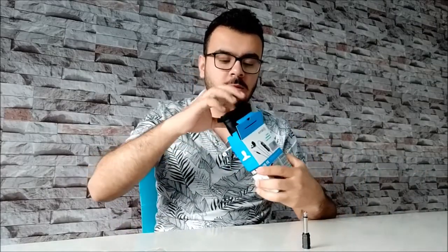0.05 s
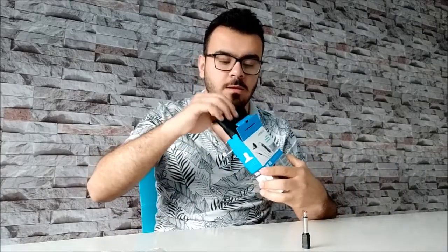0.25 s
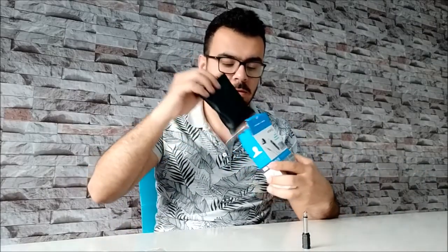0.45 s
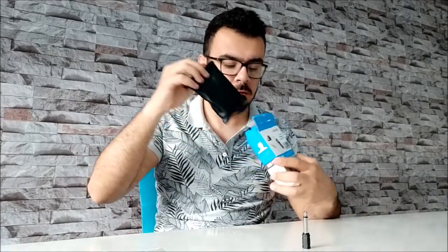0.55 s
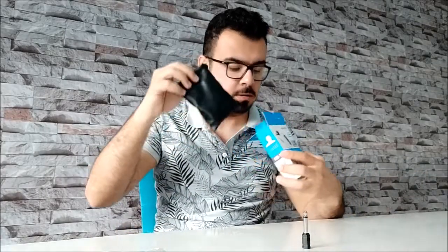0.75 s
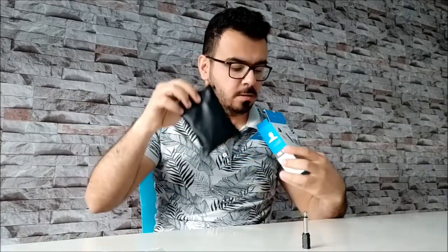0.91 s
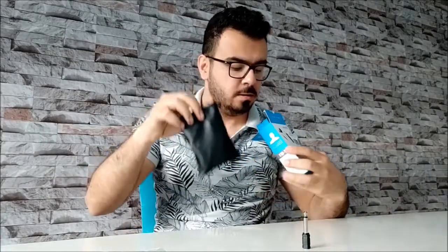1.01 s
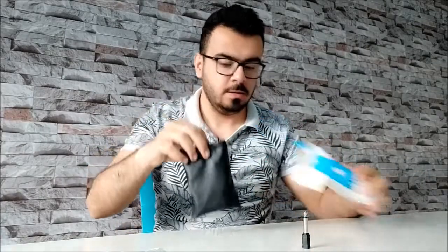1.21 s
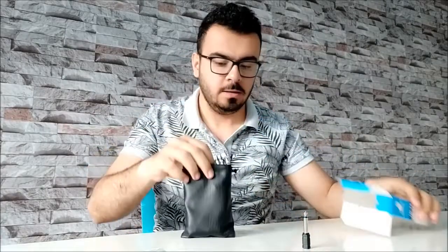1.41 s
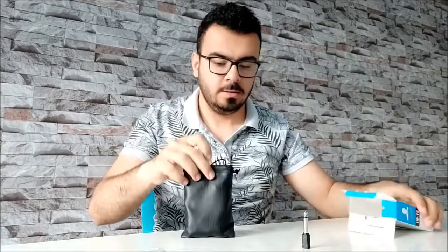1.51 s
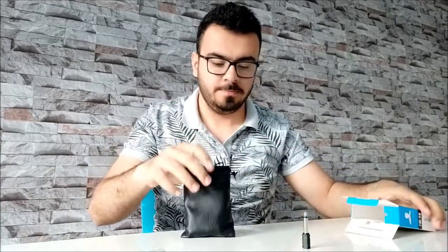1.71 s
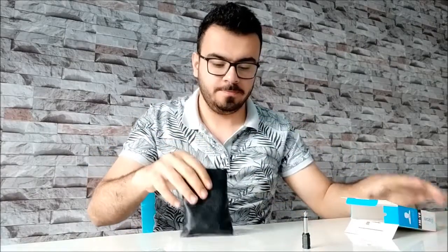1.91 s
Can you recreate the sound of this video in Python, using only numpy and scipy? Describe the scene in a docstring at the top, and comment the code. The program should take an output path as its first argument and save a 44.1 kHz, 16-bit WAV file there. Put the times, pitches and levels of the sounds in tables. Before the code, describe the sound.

Cardboard box hisses and pops as a soft pouch slides out, then is set down.

```python
"""A papery hiss swells as a soft pouch rubs its way out of a small cardboard box, then a hollow pop
as it slips free and the card flexes. Pouch and sleeve rustle; the box is put down and rocks, the
table top booms softly under it, and the pouch crumples alongside.
A stereo pair of microphones hears it all in a small, fairly live room with a low rumble."""
import sys
import numpy as np
from scipy import signal
from scipy.fft import rfft, irfft, next_fast_len
from scipy.io import wavfile
from scipy.ndimage import map_coordinates

SR = 44100
rng = np.random.default_rng(int(sys.argv[2]) if len(sys.argv) > 2 else 0)


def to_wav(sig):
    """Store sig (one row per channel, or 1-D mono) as 16-bit WAV at the path in sys.argv[1].

    Samples outside -1..1 are clipped; the rate is SR.
    """
    pcm = np.clip(np.atleast_2d(sig), -1, 1) * 32767
    pcm = np.round(pcm).astype(np.int16)
    wavfile.write(sys.argv[1], SR, pcm.T)  # frames by channels


N = 85995

RUB_SLIPS_PER_S, RUB_SPREAD_DB = 14000, 2
# Direct sound at the two microphones. Each row: frequency in Hz, left-right likeness (1 is identical).
DIRECT_LIKENESS = [(300, 0.77), (1000, 0.98), (2200, 0.26), (5000, 0.11), (10000, 0.21)]


def pouch_slide():
    """The pouch judders along the card: a fine hiss, and the air in the box answers, rising a little."""
    # Friction through the pull. Each row: time in seconds, level in dB.
    friction = [(0.122, -68), (.14, -61), (0.194, -46.5), (.25, -45), (.29, -41.5), (.335, -40),
                (0.358, -39), (.381, -50), (.388, -56), (.42, -68)]
    # Colour of the hiss. Each row: frequency in Hz, relative level in dB.
    hiss_colour = [(1200, -9.5), (1600, -10), (2500, -9), (3300, -14), (4200, -15.5), (5500, -9),
                   (7300, 0.5), (8600, 1), (9800, 1), (11000, -12), (12600, -7), (14400, -17)]
    # The air in the box. Each row: starting frequency in Hz, width in Hz, relative level in dB.
    air_modes = [(725, 130, -2.5), (888, 106, -0.5)]
    judder_db, judder_per_s, hollow_db = 1.1, 140, -8
    times, levels = np.transpose(friction)
    t = np.arange(N) / SR
    judder = map_coordinates(rng.standard_normal(N // 20), [t * judder_per_s])
    level = amp(np.interp(t, times, levels, left=-120, right=-120) + judder_db * judder)
    hiss = coloured(slips(RUB_SLIPS_PER_S, RUB_SPREAD_DB), [(150, -20.5), (500, -11.5)] + hiss_colour)
    pulled = np.interp(t, [times[0], times[-1]], [0, 1])
    hollow = np.sqrt(1 - pulled) * rubbed(air_modes) + np.sqrt(pulled) * rubbed(air_modes, pitch=1.11)
    return level * panned(-0.5) * (hiss + amp(hollow_db) * hollow)


def card_flexes():
    """The box flexes and pops in the hand, hollow, and too small to radiate bass."""
    # Each row: start in seconds, level in dB, pitch factor, ring length factor, crack in dB, pan in dB.
    flexes = [(.05, -50.5, 1.3, 0.89, -27, -1), (.3505, -26, 0.79, 0.52, -12, 0),
              (.3755, -24.5, 1.5, 0.34, -3, 5.5), (.3782, -14.5, 1.04, 0.24, -21.5, 0),
              (.3812, -11.5, 0.96, 0.74, -23.5, -1), (.428, -35, 1.35, 0.31, -5.5, -5),
              (.496, -40.5, 0.44, 0.42, 3, -1.5), (.579, -41.5, 0.72, 0.55, -10, 5),
              (.598, -44, 1.36, 0.72, -12, 2), (.884, -54.5, 1.25, 1.04, -11, -5),
              (.917, -46.5, 1.22, 1.17, -25, 1), (.968, -51, 1.355, 1.6, -17, -4),
              (1.104, -38.5, 0.9, 1.02, -28, -3), (1.253, -50, 0.78, 1.7, -9, -2),
              (1.349, -40.5, 0.94, 0.55, -18, -3.5), (1.366, -41.5, 0.8, .8, -15, -4),
              (1.794, -51, 1.05, .6, -7, 18), (1.804, -47.5, 0.9, 0.88, -5, -2)]
    # The card's modes. Each row: base frequency in Hz, relative level in dB, base T60 in seconds.
    card_modes = [(363, -15, 0.035), (644, -7, 0.036), (767.4, 4.5, 0.025), (942, -12.5, 0.036),
                  (1154, -9, 0.035), (1654, -11, 0.021), (2620, -20.5, 0.036), (3580, -21.5, 0.019)]
    # Colour of the crack. Each row: frequency in Hz, relative level in dB.
    crack_colour = [(60, -47), (160, -26), (330, -5), (700, 11), (1600, 4), (3000, -4.5), (5500, -5.5),
                    (8000, -12.5), (10000, -1), (11200, -12), (14400, -26)]
    low_cut = signal.butter(3, 278, "high", fs=SR, output="sos")
    return signal.sosfilt(low_cut, knocks(flexes, card_modes, crack_colour, crack_db=1.5))


def box_landings():
    """Box and hands land on the table, nearer the right microphone, and the box rocks."""
    # Each row: start in seconds, level in dB, pitch factor, ring length factor, crack in dB, pan in dB.
    landings = [(1.4062, -33, 1.78, 0.44, 0.5, 8), (1.4085, -26.5, 1.27, 0.34, -3.5, -1),
                (1.4168, -40, 1.6, 0.22, 2, -18), (1.4418, -22.5, 1, 1.34, -17, 1),
                (1.4485, -39, 0.79, 0.23, -23, -14), (1.4598, -27, 0.996, 0.47, -29, -4),
                (1.5048, -29.5, 1.008, 1.04, -26, -3), (1.667, -39.5, 1.06, 0.92, -11.5, -1),
                (1.7048, -41, .86, 1.55, -29, 3)]
    # The box on the table. Each row: base frequency in Hz, relative level in dB, base T60 in seconds.
    box_modes = [(316, -8, 0.034), (581, 5.5, 0.046), (676, 3.5, 0.021), (982, 0.5, 0.02),
                 (1050, -6.5, 0.017), (1576, -10, 0.042)]
    # Colour of the crack. Each row: frequency in Hz, relative level in dB.
    crack_colour = [(50, -30), (120, 10), (250, 12), (900, 12), (1800, 11), (3200, -6), (6000, -9),
                    (8500, -1), (10000, -11), (11200, -19), (14400, -19)]
    right_lead_s = 0.00014
    hits = knocks(landings, box_modes, crack_colour, crack_db=-3.5)
    return filtered(hits, lambda hz: np.exp(1j * np.pi * hz * right_lead_s * np.array([[-1], [1]])))


def table_thuds():
    """The table top booms softly as box and pouch meet it."""
    # Each row: start in seconds, relative level in dB.
    thuds = [(1.409, -40), (1.446, -39.5), (1.531, -54)]
    # The top's modes. Each row: frequency in Hz, relative level in dB, T60 in seconds.
    top_modes = [(97, -4.5, 0.16), (137, -3, 0.13), (179, 2, 0.11), (232, 2.5, 0.24), (290.8, -3.5, 0.35)]
    return sum(amp(db) * .5 * ring(top_modes, since(start)) for start, db in thuds)


def crease_snaps():
    """Creases and edges give way, each in one very short bright burst."""
    # Each row: start in seconds, level in dB, pan in dB.
    snaps = [(0.3795, -26, 3), (1.4402, -28, 2.5), (1.5012, -38.5, -18), (1.5039, -29.5, -5),
             (1.5241, -29, 2), (1.6997, -50.5, 0), (1.822, -44.5, -7)]
    # Colour of a snap. Each row: frequency in Hz, relative level in dB.
    snap_colour = [(500, 2.5), (2000, -16), (4000, -6), (6000, -11), (8000, -1.5), (10000, 4),
                   (11500, -20.5), (14400, -9.5)]
    t60_s, attack_s = 0.011, 0.00022
    out = np.zeros((2, N))
    crisp = coloured(rng.standard_normal((2, N)), snap_colour)
    for start, db, pan_db in snaps:
        t = since(start)
        out += amp(db - 60 * t / t60_s) * (1 - np.exp(-t / attack_s)) * panned(pan_db) * crisp
    return out


def rustles():
    """Folds of pouch and sleeve give way in showers of slips; the pouch rubbing against a shirt adds a papery
    rasp."""
    # Each row: start, attack, hold and T60 in seconds, then crisp level, body level and pan in dB.
    folds = [(0.46, 0.021, 0.11, 0.38, -66, -68, -3), (0.974, .035, 0.015, 0.34, -56, -58.5, -1),
             (1.071, 0.0053, 0.027, 0.24, -56.5, -59.5, 0), (1.13, .03, 0.13, 1, -68, -82, 1),
             (1.407, 0.0017, 0.049, 0.23, -62.5, -54, 0.5), (1.499, 0.0025, 0.012, .04, -50.5, -54, 7),
             (1.526, 0.0055, 0.0079, .17, -43, -44.5, -0.5), (1.644, 0.018, 0.11, 0.43, -73.5, -66.5, -4),
             (1.819, 0.0031, 0.0045, 0.077, -51.5, -69, 1), (1.832, 0.0017, 0.0038, 0.18, -54.5, -59.5, .5)]
    # A rustle's crisp top and its body. Each row: frequency in Hz, relative level in dB.
    crisp_colour = [(2000, -41), (5000, -12), (7000, -8.5), (8500, -1.5), (10000, -0.5), (11200, -9.5),
                    (14400, -16.5)]
    body_colour = [(100, -37), (300, -3), (650, 0.5), (900, 0.5), (1400, -3.5), (1750, -2), (2250, -4.5),
                   (2700, -1), (3250, -10), (3900, -4.5), (4700, -17), (8000, -26)]
    # The pouch rubbing against a shirt. Each row: start, attack, hold and T60 in seconds, level in dB.
    brushes = [(0.994, 0.039, 0.022, 0.15, -64.5), (1.067, .005, 0.012, .2, -55)]
    # Resonances of the rasp. Each row: frequency in Hz, width in Hz, relative level in dB.
    rasp_modes = [(1030, 120, -7), (1780, 180, -2.5), (2290, 250, 1.5), (4300, 500, -3)]
    slips_per_s, spread_db = 5000, -1
    crisp = coloured(slips(slips_per_s, spread_db), crisp_colour)
    body = coloured(slips(slips_per_s, spread_db), body_colour)
    out = rubbed(rasp_modes) * sum(amp(db) * stroke(*timing) for *timing, db in brushes)
    for *timing, crisp_db, body_db, pan_db in folds:
        out += stroke(*timing) * panned(pan_db) * (amp(crisp_db) * crisp + amp(body_db) * body)
    return out


def room_tail(direct):
    """The near walls return a diffuse tail in which each frequency dies at its own speed."""
    # The room's decay. Each row: frequency in Hz, T60 in seconds.
    decay_times = [(150, 0.8), (600, 0.3), (2500, 0.42), (8000, 0.28), (13000, 0.25)]
    # Colour of the tail. Each row: frequency in Hz, relative level in dB.
    tail_colour = [(100, -6), (250, 2), (600, -6.5), (2500, -1.5), (9000, -3.5), (14000, -2)]
    # Width of the tail. Each row: frequency in Hz, left-right likeness.
    likeness = [(200, 0.92), (600, 0.57), (1200, 0), (2500, 0)]
    delay_s = .004
    hz, t, noise = signal.stft(rng.standard_normal((2, N)), SR, nperseg=256)
    t60 = along(decay_times, hz)[:, None]
    fade = amp(along(tail_colour, hz)[:, None] - 60 * t / t60)
    fade *= np.sqrt(2 * np.log(1000) / (t60 * SR))  # a longer decay carries no more energy
    tail = signal.istft(noise * fade, SR, nperseg=256)[1][:, :N]
    tail = stereo(tail, likeness) * (since(delay_s) > 0)
    return signal.fftconvolve(direct, tail, axes=1)[:, :N]


def room_tone():
    """A steady low rumble and faint hiss all round the microphones."""
    # Colour of the room tone. Each row: frequency in Hz, relative level in dB.
    tone_colour = [(12, -5), (25, 4.5), (38, -2.5), (55, -5), (85, -10.5), (120, -19), (240, -18),
                   (400, -21.5), (800, -24.5), (1500, -28.5), (4000, -30.5), (9000, -30), (14400, -32)]
    # Its width. Each row: frequency in Hz, left-right likeness.
    likeness = [(40, 0.74), (200, 0.37), (1000, 0.22), (5000, 0.033)]
    return amp(-58.5) * coloured(rng.standard_normal((2, N)), tone_colour, likeness)


def microphone_ports(x):
    """The two microphone ports colour the treble differently."""
    # Each row: frequency in Hz, left minus right in dB.
    balance = [(60, -1.5), (200, 0), (1100, -1), (1700, 0), (4000, .5), (7200, -3.5), (8600, -2), (9700, 5),
               (11000, 3), (12600, 5), (14400, 1)]
    return filtered(x, lambda hz: amp(along(balance, hz) * np.array([[.5], [-.5]])))


def knocks(contacts, modes, crack_colour, crack_db):
    """Each contact rings the card, more or less damped by the hand, and adds a short dry crack."""
    crack_t60_s, crack_attack_s = 0.019, 0.0008
    out = np.zeros((2, N))
    for start, db, pitch, length, hard_db, pan_db in contacts:
        t = since(start)
        crack = coloured(rng.standard_normal((2, N)), crack_colour)
        crack *= amp(hard_db + crack_db - 60 * t / crack_t60_s) * (1 - np.exp(-t / crack_attack_s))
        out += amp(db) * panned(pan_db) * (.5 * ring(modes, t, pitch, length) + crack)
    return out


def ring(modes, t, pitch=1, length=1, attack_s=0.00076):
    """Damped modes set off at t = 0, their levels a little different at each strike."""
    tones = sum(amp(db + rng.normal(0, 1) - 60 * t / (t60 * length)) * np.sin(2 * np.pi * hz * pitch * t)
                for hz, db, t60 in modes)
    return tones * (1 - np.exp(-t / attack_s))


def rubbed(modes, pitch=1):
    """A stream of slips through broad resonances, rms 1."""
    def response(hz):
        return sum(amp(db) * (-1) ** k * 1j * hz * width
                   / ((centre * pitch) ** 2 - hz * hz + 1j * hz * width)
                   for k, (centre, width, db) in enumerate(modes))
    return unit(stereo(filtered(slips(RUB_SLIPS_PER_S, RUB_SPREAD_DB), response), DIRECT_LIKENESS))


def slips(per_s, spread_db):
    """Tiny stick-slip impulses of uneven size at random moments."""
    size = amp(spread_db * np.minimum(rng.exponential(size=N), 4))
    return (rng.random(N) < per_s / SR) * size * rng.standard_normal((2, N))


def stroke(start, attack, hold, t60):
    """Attack, hold and release of one movement."""
    return np.minimum(since(start) / attack, 1) * amp(-60 * since(start + attack + hold) / t60)


def coloured(pair, spectrum, likeness=DIRECT_LIKENESS):
    """A stereo texture of rms 1 with a given spectrum."""
    return unit(stereo(filtered(pair, lambda hz: amp(along(spectrum, hz))), likeness))


def stereo(pair, likeness):
    """Two unrelated signals blended to a given left-right likeness."""
    turn = lambda hz: np.arccos(np.clip(along(likeness, hz), -1, 1)) / 2
    mid, side = filtered(pair, lambda hz: np.array([np.cos(turn(hz)), np.sin(turn(hz))]))
    return np.array([mid + side, mid - side])


def filtered(x, response):
    """x through a complex frequency response."""
    size = next_fast_len(N + SR // 2)
    return irfft(rfft(x, size) * response(np.fft.rfftfreq(size, 1 / SR)), size)[..., :N]


def panned(pan_db):
    """Left and right gains, the left louder by pan_db."""
    return amp(np.array([[pan_db], [-pan_db]]) / 2)


def since(start):
    """Seconds since a moment, zero before it."""
    return np.maximum(np.arange(N) / SR - start, 0)


def along(points, hz):
    """(Hz, value) points interpolated on a log frequency axis."""
    freqs, values = np.transpose(points)
    return np.interp(np.log(hz + 1), np.log(freqs + 1), values)


def unit(x):
    """Scaled to rms 1."""
    return x / np.sqrt(np.mean(x ** 2) + 1e-20)


def amp(db):
    """Decibels to gain."""
    return 10 ** (np.asarray(db) / 20)


def scene():
    """The handling and its reverberation reach the microphones, over the room tone."""
    direct = pouch_slide() + card_flexes() + box_landings() + table_thuds() + rustles() + crease_snaps()
    return microphone_ports(direct + room_tail(direct)) + room_tone()


def record(dry):
    """The recorder keeps nothing above 14.4 kHz."""
    return filtered(dry, lambda hz: hz < 14400)


dry = scene()
out = record(dry)
to_wav(out)
```